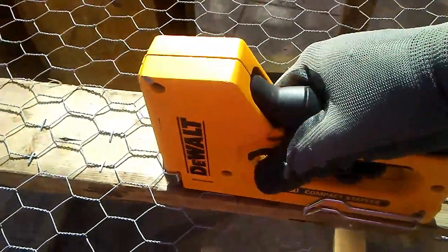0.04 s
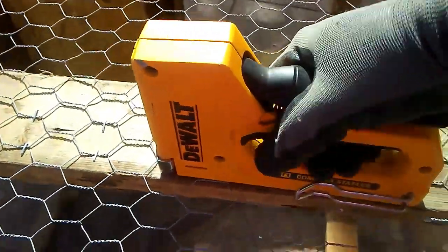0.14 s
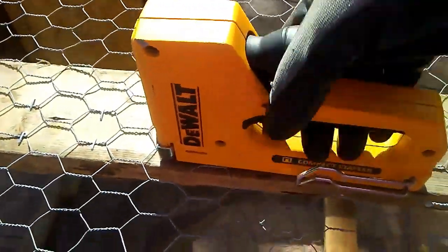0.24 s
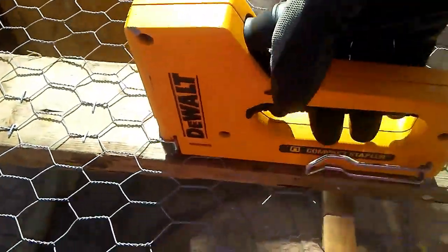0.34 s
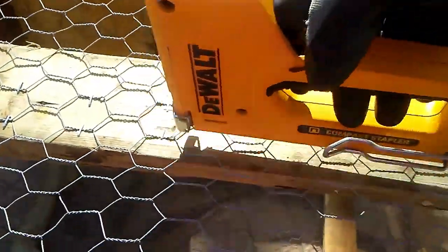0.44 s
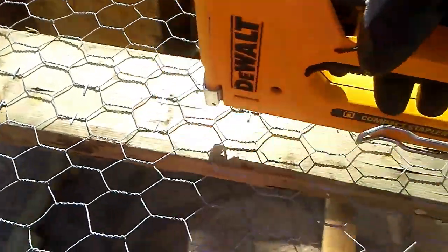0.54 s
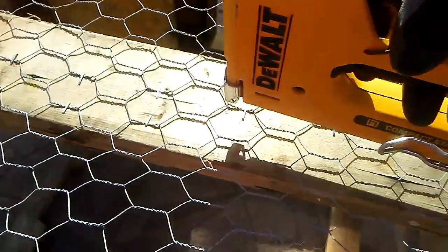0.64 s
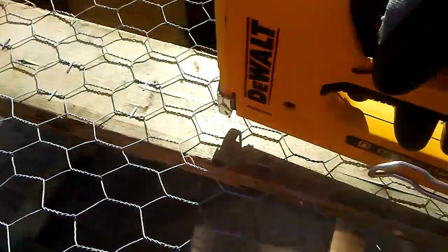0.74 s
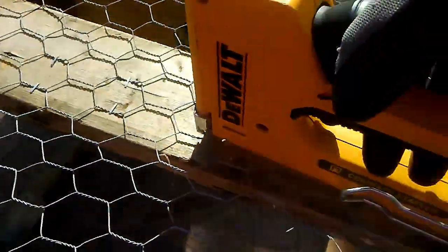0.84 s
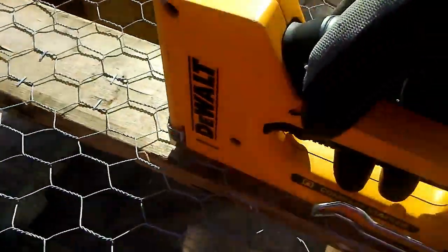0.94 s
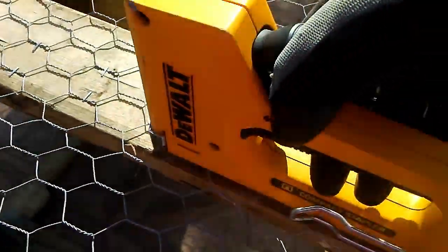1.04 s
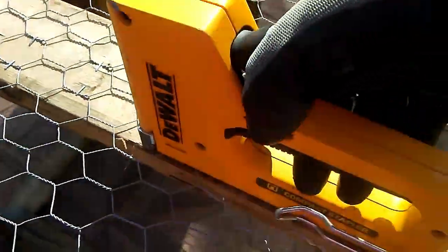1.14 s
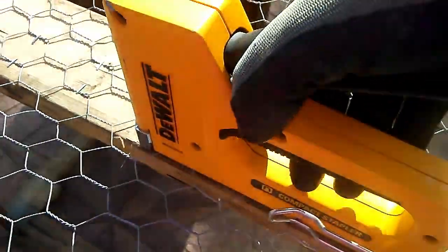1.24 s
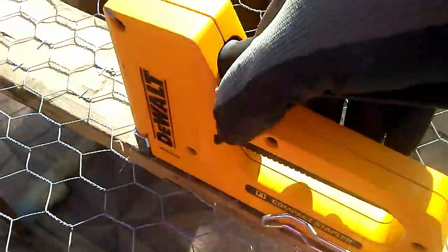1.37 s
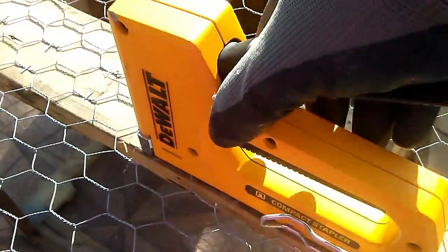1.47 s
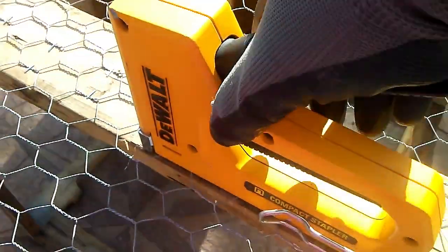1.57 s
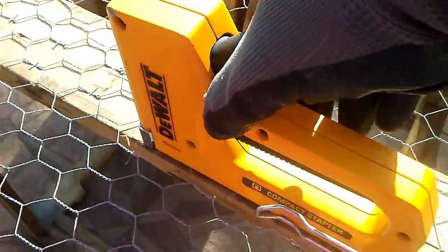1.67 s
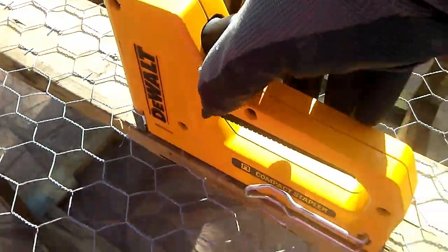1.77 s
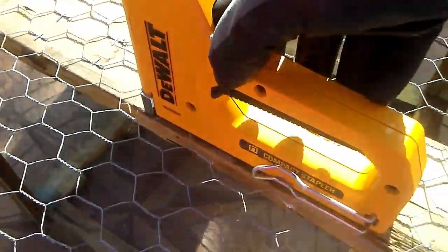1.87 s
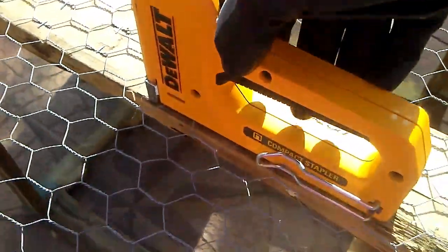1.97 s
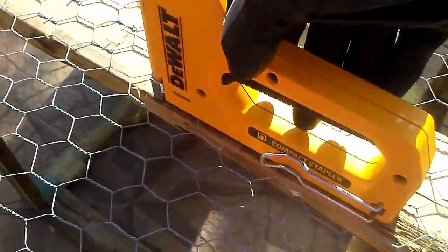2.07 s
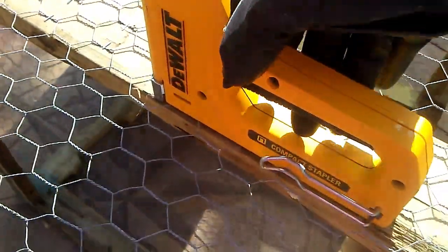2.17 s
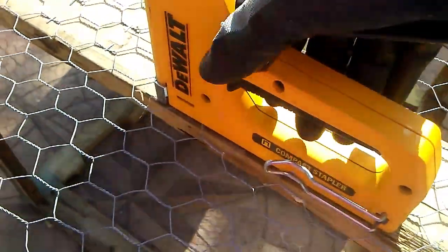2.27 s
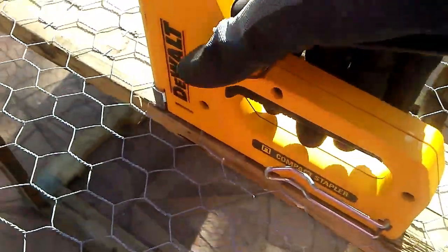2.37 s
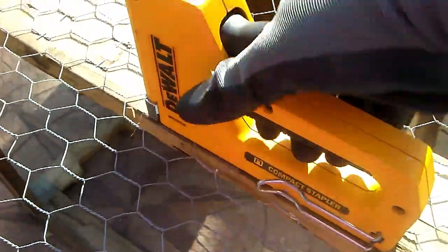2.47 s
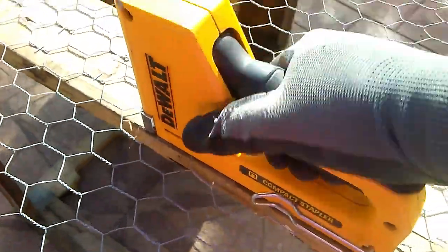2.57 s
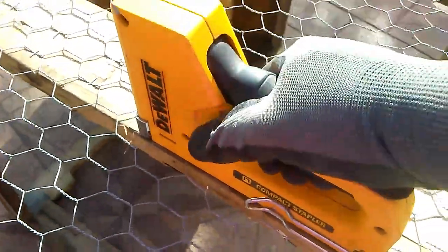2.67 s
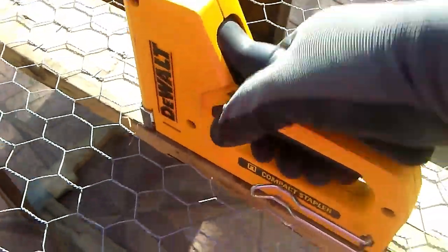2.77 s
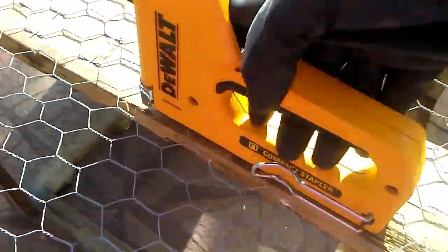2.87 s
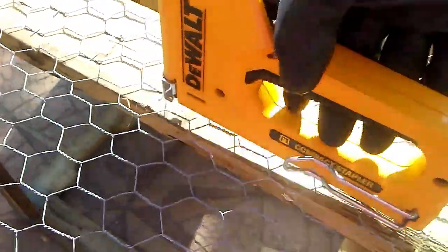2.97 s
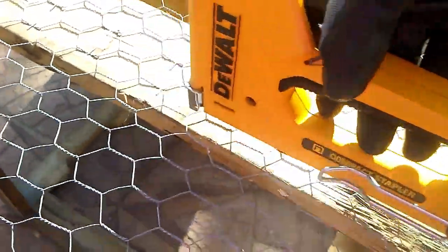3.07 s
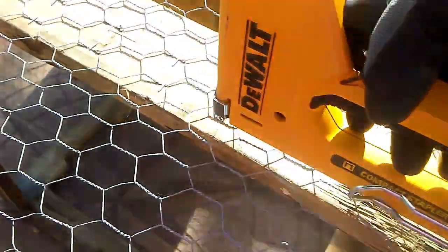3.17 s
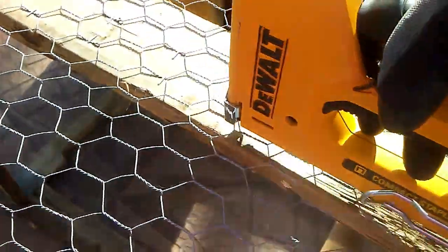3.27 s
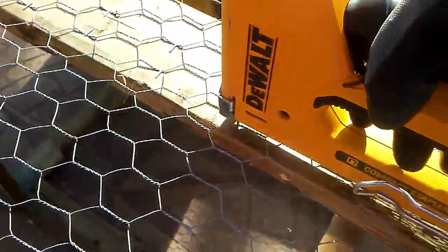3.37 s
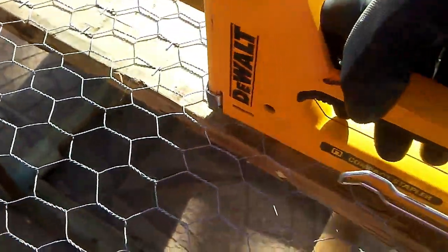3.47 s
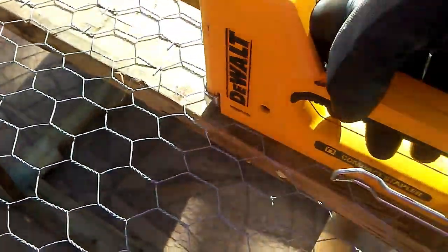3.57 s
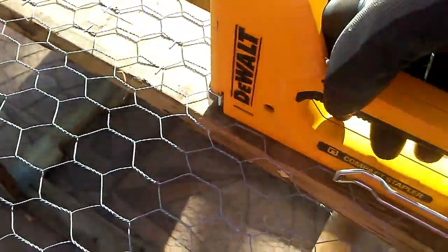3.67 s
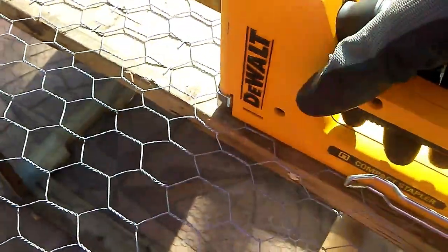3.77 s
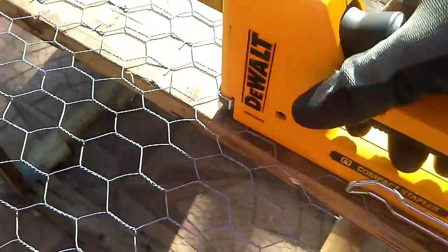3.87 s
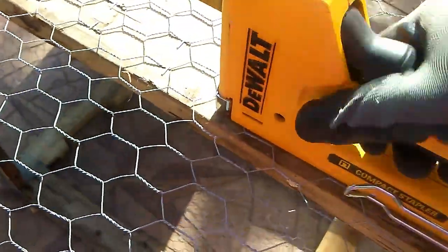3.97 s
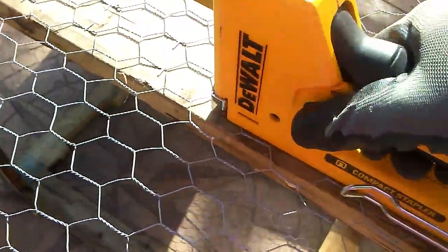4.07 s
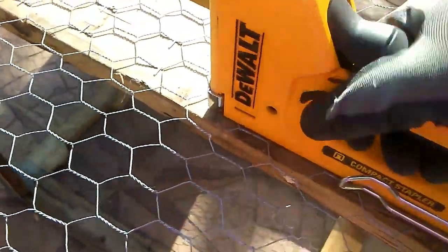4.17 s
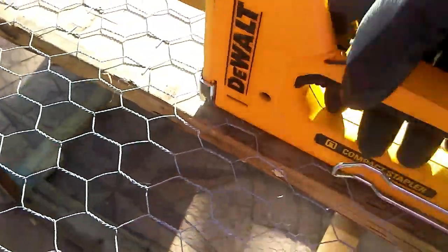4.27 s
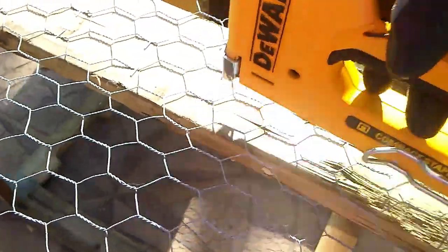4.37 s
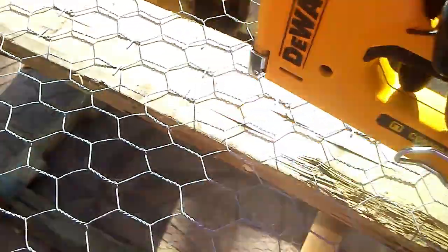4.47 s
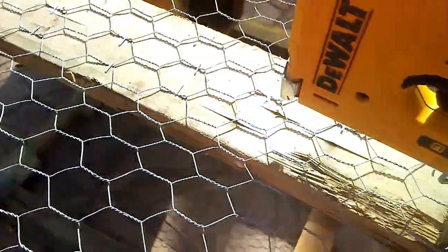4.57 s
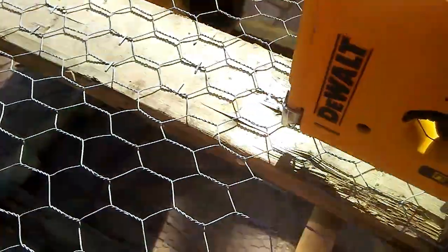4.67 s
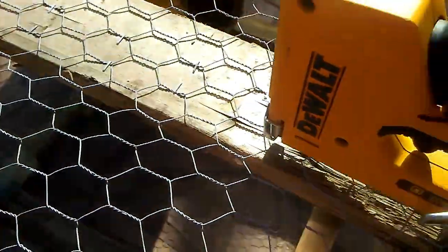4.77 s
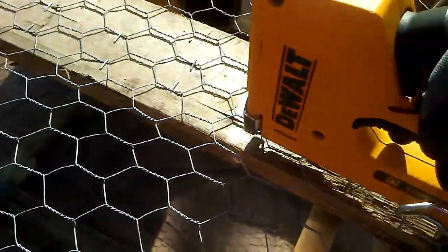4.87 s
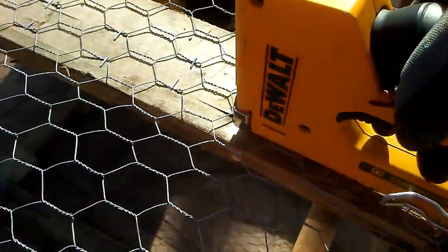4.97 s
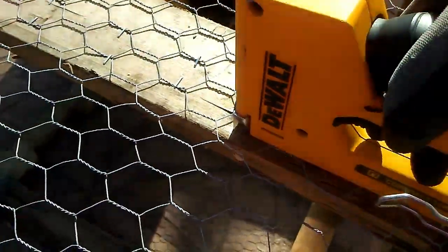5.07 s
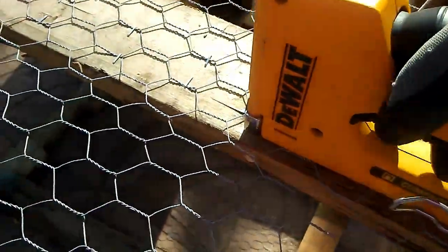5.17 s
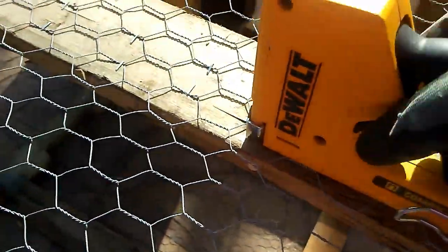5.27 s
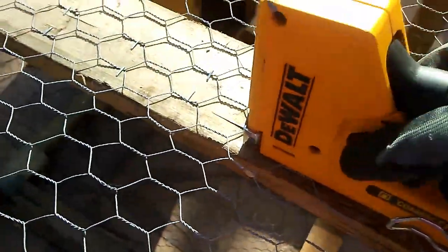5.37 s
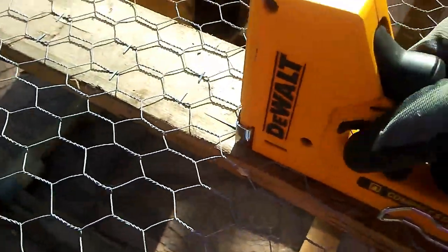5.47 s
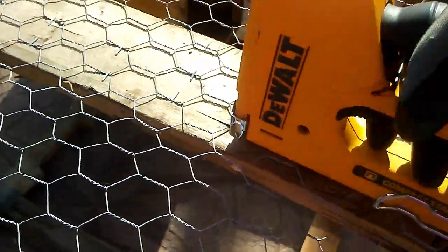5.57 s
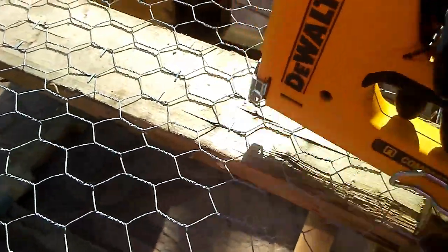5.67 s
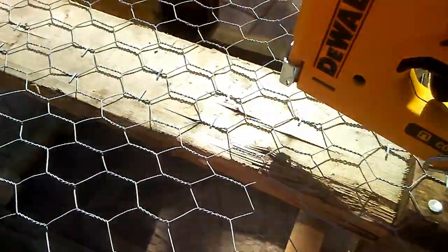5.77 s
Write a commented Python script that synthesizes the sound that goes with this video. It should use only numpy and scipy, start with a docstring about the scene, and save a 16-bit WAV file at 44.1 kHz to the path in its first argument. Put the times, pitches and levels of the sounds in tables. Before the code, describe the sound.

A close, single-channel outdoor sound of a hand staple gun on a mesh-covered wooden frame. It begins inside a loud shot, a bright crack and mesh rattle dying away within half a second. From 0.3 to 0.45 s the lever returns with creaking and several sharp clacks. A quieter stretch follows, with faint bird chirps around 0.65-0.9 and 1.5-1.8 s, a click at 1.2 s and tiny ticks; a twitter sounds at 2.35 s. The lever creaks and a hard shot slams at 2.66 s, then clanks near 3.0 s. The bird warbles at 3.6-3.8 s as the tool lands with a soft woody knock at 3.7 s. Another shot hits at 4.09 s, with clacks at 4.4 s. The tool lands again at 5.16 s and fires at 5.43 s, ending with clacks around 5.7 s. Faint yard hiss and a low, distant motor hum continue underneath.

```python
"""Outdoors in a yard, a hand staple gun close by drives staples through wire mesh into a wooden frame.
Shots are shaped noise for blast, mesh and microphone resonance, plus decaying sines for steel and wood.
Lever and latch click as short noise bursts with a faint ring; strokes creak and scrape as grainy noise.
A small bird sings gliding sines with echoes, over a far motor's humming sines and patchy yard hiss.
The recorder softly clips the loudest peaks."""
import sys
import numpy as np
from scipy import signal
from scipy.fft import rfft, irfft, next_fast_len
from scipy.io import wavfile
from scipy.ndimage import uniform_filter1d, map_coordinates

SR = 44100
rng = np.random.default_rng(int(sys.argv[2]) if len(sys.argv) > 2 else 0)


def wav_out(sig):
    """Save sig, one row per channel (or a flat mono array), as 16-bit PCM at SR to the path in sys.argv[1]."""
    wavfile.write(sys.argv[1], SR, np.round(np.clip(np.atleast_2d(sig).T, -1, 1) * 32767).astype(np.int16))


N = 256662  # length [samples]


def amp(db):
    """Decibels to linear gain."""
    return 10 ** (np.asarray(db) / 20)


def unit(x):
    """Scales a sound to an RMS of one."""
    return x / np.sqrt(np.mean(x ** 2) + 1e-20)


def along(points, hz):
    """Reads a curve of (frequency [Hz], value) points on a log frequency axis."""
    f, v = np.transpose(points)
    return np.interp(np.log(hz + 1), np.log(f + 1), v)


def wobble(rate, size=N):
    """A smooth random curve with rate knots a second."""
    knots = rng.standard_normal(int(size * rate / SR) + 4)
    return map_coordinates(knots, [np.arange(size) * rate / SR])


def filtered(x, response):
    """Multiplies the spectrum of x by a response of frequency."""
    m = next_fast_len(len(x) + 4096)
    return irfft(rfft(x, m) * response(np.fft.rfftfreq(m, 1 / SR)), m)[:len(x)]


def add(track, s, sound):
    """Mixes a sound in at s seconds; what falls outside the track is lost."""
    i = round(s * SR)
    sound = sound[max(-i, 0):][:N - max(i, 0)]
    track[max(i, 0):][:len(sound)] += sound


def ringing(modes, t, blur, stretch=1):
    """Struck modes as decaying sines; scattered levels and wandering phase keep them from sounding glassy."""
    total = np.zeros(len(t))
    for hz, db, t60 in modes:
        decay = amp(db + rng.normal(0, 1.08) - 60 * t / (t60 * stretch))
        phase = 2 * np.pi * hz * t + np.cumsum(rng.normal(0, blur, len(t)))
        total += decay * np.sin(phase)
    return total


# Colour of the yard hiss: (frequency [Hz], relative density [dB per Hz])
YARD_COLOUR = [(15, -53.5), (28, -32), (60, -0.5), (104, -29), (188, -2), (538, -4), (668, -4.5),
               (806, -4.5), (1500, -8.5), (1710, -7), (2940, -2.5), (3740, 1.5), (4400, -22.5),
               (5300, -28.5), (6950, -10.5), (8620, -18), (15600, -41)]
YARD_DB = -46  # RMS of the hiss before its swell


def yard_hiss():
    """Far noise whose level is patchy across time and frequency, swelling slowly."""
    z = signal.stft(rng.standard_normal(N), nperseg=512)[2]
    field = uniform_filter1d(uniform_filter1d(rng.standard_normal(z.shape), 6, 0), 14, 1)
    noise = signal.istft(z * amp(1.9 * unit(field)), nperseg=512)[1][:N]
    swell_db = 1.5 * wobble(2.5)
    return amp(YARD_DB + swell_db) * unit(filtered(noise, lambda hz: amp(along(YARD_COLOUR, hz))))


# Motor orders, multiples of its base pitch from the second up: (mean level [dB])
MOTOR_ORDERS = [-71, -60, -55, -60, -63.5, -66, -72, -64.5]
MOTOR_HZ = 55.03


def motor_hum():
    """Sine orders of a far motor share one drifting speed, and each wavers in level."""
    t = np.arange(N) / SR
    drift = np.cumsum(0.0033 * wobble(1.52)) / SR
    hum = np.zeros(N)
    for k, db in enumerate(MOTOR_ORDERS, 2):
        level = amp(db + 1.7 * wobble(4.43))
        hum += level * np.sin(2 * np.pi * (k * MOTOR_HZ * (t + drift) + rng.random()))
    return hum


# The bird's three figures: (time from the highest pitch [s], pitch [Hz], relative level [dB])
WARBLE_FIGURE = [(-.035, 3100, -12), (0, 4250, -5), (.008, 3930, 2), (.013, 3750, 1), (.028, 3000, -4.5),
                 (.048, 3400, -11.5), (.068, 3750, 0.5), (.08, 3050, -2), (.1, 2800, -14)]
TWITTER_FIGURE = [(-.035, 2844, -16), (-.015, 3400, -11.5), (0, 4500, -5), (.009, 3925, -4),
                  (.013, 3603, 4.5), (.021, 3976, -7), (.025, 2483, -9.5), (.035, 3580, 2),
                  (.05, 3860, -18), (.07, 3440, -15), (.095, 3730, -39)]
SLIDE_FIGURE = [(-.02, 3750, -16), (0, 3900, -10), (.02, 3520, 0), (.05, 3250, -4), (.095, 2950, -14)]
# When each figure is sung: (time of the highest pitch [s], level [dB], length over the usual [ratio])
WARBLE_CALLS = [(0.786, -37.5, 1.05), (3.57, -34, 1.01)]
TWITTER_CALLS = [(2.343, -33.5, 1.02), (3.767, -32, .98)]
SLIDE_CALLS = [(.648, -43, 1.05), (.735, -46, .45), (.875, -42, .45), (.92, -47, .4), (1.535, -44, .95),
               (1.65, -46, .55), (1.82, -48, .8)]
HOARSE_DB = 4  # depth of the fast level flicker


def bird():
    """Gliding whistles with a hoarse flicker, blurred by a decaying noise echo of the yard."""
    out = np.zeros(N)
    songs = ((WARBLE_FIGURE, WARBLE_CALLS), (TWITTER_FIGURE, TWITTER_CALLS), (SLIDE_FIGURE, SLIDE_CALLS))
    for figure, calls in songs:
        at, hz, db = np.transpose(figure)
        for crest, call_db, stretch in calls:
            s = crest + at * stretch
            t = np.arange(s[0], s[-1], 1 / SR)
            pitch = np.interp(t, s, hz) * (1 + 0.016 * wobble(300, size=len(t)))
            edge = np.clip(np.minimum(t - s[0], s[-1] - t) / 0.0012, 0, 1)
            flicker_db = HOARSE_DB * wobble(204, size=len(t))
            level = amp(call_db + np.interp(t, s, db) + flicker_db) * edge
            add(out, s[0], level * np.sin(2 * np.pi * np.cumsum(pitch) / SR))
    t = np.arange(SR // 6) / SR
    tail = rng.standard_normal(len(t)) * amp(-60 * t / 0.18)
    out = out + amp(1.5) * signal.fftconvolve(out, tail / np.linalg.norm(tail))[:N]

    def microphone_band(hz):
        """The whistles come through strongest near 3.7 kHz and roll off steeply above."""
        return amp(6 / (1 + ((hz - 3700) / 250) ** 2)) / (1 + (hz / 4400) ** 16)

    return filtered(out, microphone_band)


# The glove loads the lever: (start [s], length [s], creak level at the end [dB])
LEVER_PULLS = [(2.58, 0.074, -29.5), (3.983, 0.1, -36), (5.353, 0.083, -30)]
# The glove lets it back or shifts its grip: (start [s], length [s], creak level at the start [dB])
LEVER_RETURNS = [(0.305, 0.19, -42), (2.462, 0.11, -41.5), (2.917, 0.099, -44.5), (4.333, 0.17, -40),
                 (5.128, .22, -40.5), (5.605, 0.19, -42)]
PULL_GROWS_DB, RETURN_FADES_DB = 8.5, 5  # level change over a stroke
SCRAPE_DB = -10.5  # scrape against creak
EASE_S = .015  # soft start and end of a stroke


def slips():
    """Noise made grainy by two rates of level wobble, like uneven slips of pivot and spring."""
    return unit(rng.standard_normal(N) * amp(1.6 * wobble(150) + 2.5 * wobble(40)))


def squeeze():
    """The lever's slips give a low creak with a gliding resonance and a thin scrape."""
    creak_colour = [(700, -33.0), (1300, -10.5), (3000, -7.5), (4000, -6.0), (4500, -40.0)]  # (Hz, dB)
    scrape_colour = [(4500, -39), (6000, -13.5), (7800, -2), (9500, -14.5), (15000, -46)]  # (Hz, dB)
    bed = filtered(slips(), lambda hz: amp(along(creak_colour, hz)))
    low = filtered(slips(), lambda hz: 1 / (1 + ((hz - 1700) / 130) ** 2))
    high = filtered(slips(), lambda hz: 1 / (1 + ((hz - 2050) / 130) ** 2))
    turn = np.pi / 4 * (1 + np.tanh(wobble(30)))  # wanders between the two resonances
    creak = unit(bed + np.cos(turn) * low + np.sin(turn) * high)
    scrape = unit(filtered(slips(), lambda hz: amp(along(scrape_colour, hz))))
    strokes = [(s, length, db - PULL_GROWS_DB, db) for s, length, db in LEVER_PULLS]
    strokes += [(s, length, db, db - RETURN_FADES_DB) for s, length, db in LEVER_RETURNS]
    out = np.zeros(N)
    for s, length, first_db, last_db in strokes:
        i = np.arange(round(s * SR), min(round((s + length) * SR), N))
        edge = np.clip(np.minimum(i - i[0], i[-1] - i) / (EASE_S * SR), 0, 1)
        level = edge * amp(np.linspace(first_db, last_db, len(i)))
        out[i] += level * (creak[i] + amp(SCRAPE_DB) * scrape[i])
    return out


# The gun lands on the frame: (time [s], level [dB])
LANDINGS = [(3.7, -26), (5.159, -27), (5.2, -32), (5.331, -33.5)]
# Modes of the wooden frame, also rung by the shots: (frequency [Hz], relative level [dB], full t60 [s])
FRAME_MODES = [(275, -13.5, 0.96), (308, -5.5, 0.98), (341.5, -6.5, 0.9), (388, -6, 0.36), (469, 0, 0.068),
               (733, -7, 0.14), (975, -8.5, 0.68)]


def set_down():
    """The frame booms softly under the weight of the gun, its modes damped to a quarter of their decay."""
    out, t = np.zeros(N), np.arange(SR // 3) / SR
    for s, db in LANDINGS:
        boom = ringing(FRAME_MODES, t, blur=0.047, stretch=0.25) * (1 - np.exp(-t / 0.0048))
        add(out, s, amp(db) * boom)
    return out


# Lever, latch and nose contacts: (time [s], level [dB], treble [dB], strongest ring [Hz])
CONTACTS = [(0.231, -27, 0, 6000), (0.243, -28, 10, 3900), (0.309, -23, -7, 2410), (0.321, -17, -10, 1760),
            (0.329, -5, -1.5, 2680), (0.346, -32, -11, 2270), (0.353, -15, -10, 3820),
            (0.398, 2.5, -10, 5230), (0.431, -2, -3, 5160), (0.445, -22, 13, 3220),
            (0.618, -41.5, 10, 8200), (0.655, -29, -9, 1580), (1.207, -10, -1, 3600), (1.461, -30, 2, 7400),
            (1.556, -36, 6, 8100), (1.821, -36, 7, 7100), (1.838, -30, -20, 1620), (1.92, -30, -1, 7090),
            (2.386, -19.5, 7, 3670), (2.484, -20, -1.5, 1940), (2.595, -30, 5, 8000),
            (2.626, -10.5, 3, 7700), (2.85, -21, -16, 2100), (2.955, -21, 4, 1760),
            (2.985, -7, -10.5, 6530), (3.015, -12, -12, 3900), (3.038, -12, -7.5, 2700),
            (3.045, -15.5, -2, 3740), (3.524, -26, 5, 3220), (3.7, -7, -6, 2700), (3.706, -6.5, -19, 3900),
            (3.731, -34, 12, 7500), (3.745, -30.5, 12, 7700), (3.789, -21.5, -8, 2400),
            (3.873, -28.5, -40, 1610), (3.985, -32, -10, 2600), (4.013, -27, -3, 1710),
            (4.048, -16.5, 3, 1840), (4.287, -24.5, 0, 1690), (4.37, -21, -1, 3140), (4.388, -8, -6, 2290),
            (4.397, -12.5, -22, 3740), (4.405, -13, -12, 2830), (4.42, 0, -11.5, 2270),
            (4.436, -7, -4.5, 2800), (5.124, -31, 11, 7040), (5.138, -34, 13, 6000),
            (5.158, 0.5, -5.5, 5500), (5.166, -2.5, -10, 4020), (5.202, -16.5, -4, 3700),
            (5.248, -22.5, -1, 2500), (5.254, -14.5, -12, 3670), (5.266, -44, 6, 7000),
            (5.297, -28, -14, 3320), (5.331, -16, -2.5, 3000), (5.395, -17.5, 9, 1750),
            (5.401, -14.5, 1, 7000), (5.658, -10, -3.5, 3120), (5.677, -14, -6, 3800),
            (5.683, -21.5, 3, 2520), (5.716, -1.5, -12, 3020)]
# Colour common to the contacts: (frequency [Hz], relative density [dB per Hz])
CLANK_COLOUR = [(240, -43), (400, -8.5), (633, -18.5), (874, -7.5), (1190, -18.5), (1770, -4), (2230, -5.5),
                (3070, -9.5), (3860, -3.5), (4720, -20), (5850, -1), (7030, -6.5), (7820, -1.5),
                (12800, -34), (15600, -36)]
# Modes of the steel housing, also rung by the shots: (frequency [Hz], relative level [dB], full t60 [s])
HOUSING_MODES = [(1370, -13, 0.33), (2840, -12.5, 0.37), (3265, -6, 0.33), (3970, -12, 0.33),
                 (4177, -4.5, 0.26), (4490, -1, 0.24), (5020, 4, 0.12), (4994, 1, 0.22), (5460, -8, 0.3),
                 (5420, -40, 0.13), (5860, -4.5, 0.26)]
RISE_MS, RISE_MS_PER_DB = 1.37, 0.01  # rise of a 0 dB contact; softer ones peak slightly sooner
LOW_DB, DULLER_PER_DB = -3.5, 0.57  # low part of a 0 dB contact; softer ones have more of it
TICK_RING = .24  # housing decay after a contact over that after a shot


def clicks():
    """Each contact is a short chatter of steel on steel that leaves the housing ringing faintly."""
    out, t = np.zeros(N), np.arange(SR // 8) / SR
    for s, db, treble_db, ring_hz in CONTACTS:
        tilt = [(2600, LOW_DB - DULLER_PER_DB * db), (3600, 0.0088), (5500, treble_db)]  # (Hz, dB)

        def colour(hz):
            """Clank colour, tilted, with a 9 dB peak at the strongest ring."""
            peak_db = 9 / (1 + ((hz / ring_hz - 1) / 0.084) ** 2)
            return amp(along(CLANK_COLOUR, hz) + along(tilt, hz) + peak_db)

        u = t / (np.clip(RISE_MS + RISE_MS_PER_DB * db, .3, 6) / 1000)  # time in rise times
        swell = u * np.exp(1 - u)
        after = amp(-8.0 - 60 * t / 0.079) * (1 - np.exp(-u))
        chatter = swell * amp(5.6 * wobble(590, size=len(t))) + after
        noise = unit(filtered(rng.standard_normal(len(t)), colour))
        burst = noise * chatter
        burst = burst / np.sqrt(np.sum(burst ** 2) / np.sum(swell ** 2))  # set energy a contact
        ring = filtered(ringing(HOUSING_MODES, t, blur=0.028, stretch=TICK_RING), colour)
        ring = ring * (1 - np.exp(-u))
        add(out, s - .001, amp(db) * (amp(-7.5) * burst + amp(-18.5) * ring))
        # a brief, faint noise swells just before each contact
        add(out, s - .009, amp(db - 48.5 + 2650 * t[:360]) * noise[-360:])
    return filtered(out, lambda hz: hz ** 4 / (hz ** 4 + 600 ** 4))  # small parts radiate no bass


# The shots: (time [s], blow level [dB], frame level against the blow [dB])
GUN_SHOTS = [(-.03, 7.5, -3.5), (2.656, 7, -1.5), (4.088, 6, -1.5), (5.43, 7.5, -1.5)]
# Colour of the blast: (frequency [Hz], relative density [dB per Hz])
BLAST_COLOUR = [(24, -72), (40, -33), (146, -36), (360, -6), (820, -14.5), (1190, -11), (1380, -7),
                (1650, -5.5), (2060, -2.5), (3000, -3), (3760, -1), (4820, -2.5), (6510, 0.5), (10200, -13),
                (15600, -35)]
# First decay of the mesh rattle: (frequency [Hz], t60 [s])
MESH_DECAY = [(50, 0.031), (300, 0.14), (1000, 0.22), (3700, 0.12), (7000, 0.15), (11000, 0.14),
              (15000, 0.053)]
CHATTER_DB, CHATTER_S = 3, .06  # loose parts break up the start of a shot; depth and its fade
STEEL_BLUR, WOOD_BLUR = .13, .06  # phase wander of the modes [radians a sample]


def mesh_rattle(noise, t):
    """Shaken mesh: noise decaying at its own rate in each band, patchy, with a weaker, longer tail."""
    hz, frames, z = signal.stft(noise, SR, nperseg=256)
    t60 = along(MESH_DECAY, hz)[:, None]
    field = uniform_filter1d(uniform_filter1d(rng.standard_normal(z.shape), 4, 0), 5, 1)
    patches = amp(3.04 * unit(field))
    fall = amp(-60 * frames / t60) + amp(-18.0 - 60 * frames / (2.86 * t60))
    rattle = signal.istft(z * fall * patches, SR, nperseg=256)[1][:len(t)]
    return rattle * amp(0.54 * wobble(111.0, size=len(t)))


def microphone_ring(noise, t):
    """The microphone's resonance near 3.7 kHz rings after a shot, with a flickering two-stage decay."""
    band = unit(filtered(noise, lambda hz: 1 / (1 + ((hz - 3680) / 170) ** 4)))
    fall = amp(-60 * t / 0.26) + amp(-25 - 60 * t / 0.61)
    return band * fall * amp(4.2 * wobble(109, size=len(t)))


def crack(t):
    """The sharp top of the blow: noise above 9 kHz with a fast decay and a faint tail."""
    treble = unit(filtered(rng.standard_normal(len(t)), lambda hz: hz ** 6 / (hz ** 6 + 9000 ** 6)))
    return treble * (amp(-60 * t / 0.051) + amp(-25.5 - 60 * t / 0.37))


def shots():
    """The spring lets go, the driver slams home, and housing, frame and mesh go on shaking."""
    out, t = np.zeros(N), np.arange(SR // 2) / SR
    for s, blow_db, frame_db in GUN_SHOTS:
        noise = unit(filtered(rng.standard_normal(len(t)), lambda hz: amp(along(BLAST_COLOUR, hz))))
        body = amp(-7.5) * mesh_rattle(noise, t) + amp(-17) * microphone_ring(noise, t)
        body += amp(-18) * crack(t) + amp(-16.5) * ringing(HOUSING_MODES, t, blur=STEEL_BLUR)
        body *= amp(CHATTER_DB * np.exp(-t / CHATTER_S) * wobble(252, size=len(t)))
        body *= 1 - np.exp(-(t / 0.0036) ** 2)  # onset
        wood = ringing(FRAME_MODES, t, blur=WOOD_BLUR) * (1 - np.exp(-t / 0.0024))
        add(out, s - .002, amp(blow_db) * (body + amp(-30.0 + frame_db) * wood))
        slide = noise[-SR // 100:]  # the driver scrapes down its channel just before the blow
        add(out, s - len(slide) / SR, amp(blow_db - 42.5 + 1700 * t[:len(slide)]) * slide)
    return out


def scene():
    """Layers the yard, motor and bird under the staple gun, as one channel."""
    background = yard_hiss() + motor_hum() + bird()
    return (background + squeeze() + set_down() + clicks() + shots())[None]


TOP_HZ = 15740  # band limit


def record(dry):
    """The recorder cuts the deepest bass, softly clips loud peaks and keeps nothing above its band limit."""
    cut = filtered(dry[0], lambda hz: hz ** 3 / (hz ** 3 + 48 ** 3))
    clipped = cut / (1 + np.abs(cut / 0.79) ** 5) ** (1 / 5)
    return filtered(clipped, lambda hz: np.clip((TOP_HZ + 150 - hz) / 300, 0, 1))[None]


dry = scene()
out = record(dry)
wav_out(out)
```